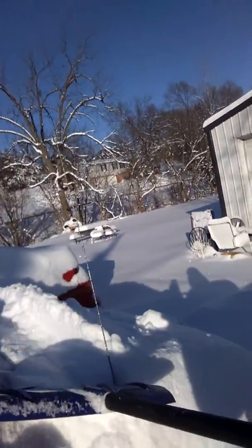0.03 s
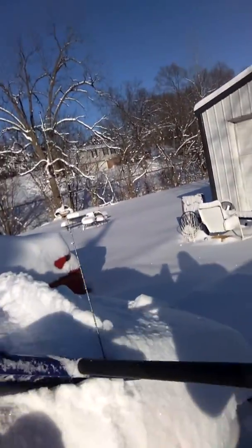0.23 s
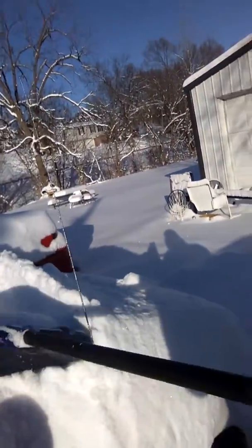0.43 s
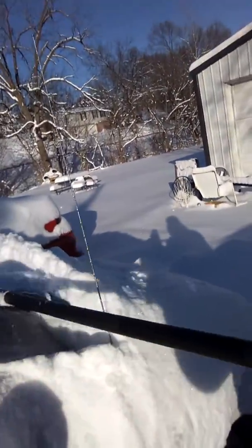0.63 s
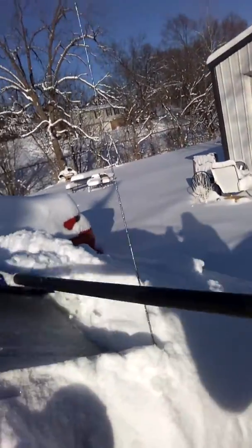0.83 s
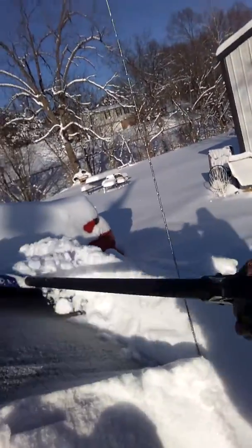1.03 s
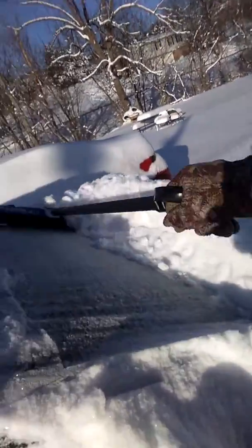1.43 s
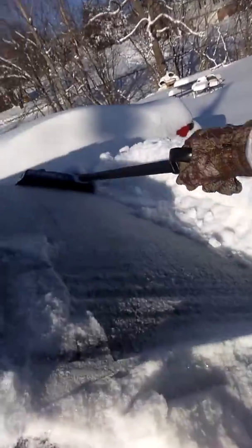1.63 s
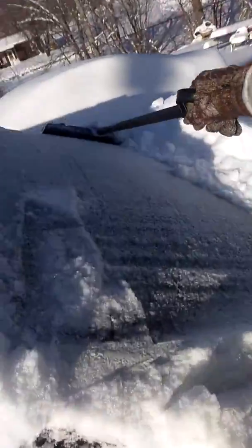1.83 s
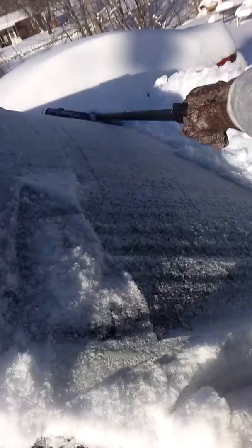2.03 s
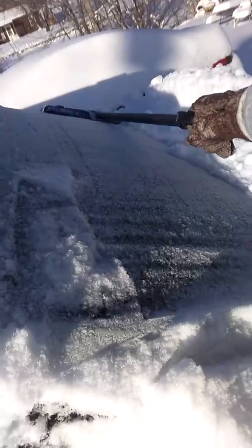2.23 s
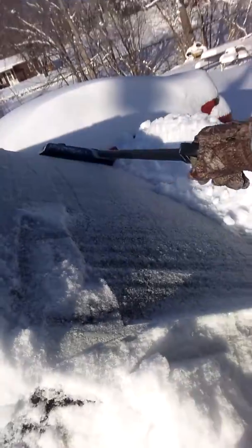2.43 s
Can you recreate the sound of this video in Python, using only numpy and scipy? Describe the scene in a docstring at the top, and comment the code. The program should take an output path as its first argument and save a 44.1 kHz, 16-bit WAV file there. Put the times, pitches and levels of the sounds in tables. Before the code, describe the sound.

A snow brush scrapes across a frosty car window, close by. The gritty, fizzing rasp swells from about 0.1 seconds and stays loud from 0.3 to 1.6, with a hollow drone from the glass and a few light bumps. From 1.7 to 2.5 seconds it eases into a faint snowy rustle with small ticks of ice. Low wind puffs thump the microphone, mostly between 1.5 and 2.2 seconds.

```python
"""A snow brush scrubs across a frosty car window, close to a handheld camera. Its bristles stick and slip:
they rasp and fizz on the frost while the pane drones underneath. The brush then eases off into soft snow,
with ticks of ice and bristle flicks, as puffs of air thump on the two microphone ports.
The ports have opposite polarity; the left one rings near 10 kHz and clips at the height of the stroke."""
import sys
import numpy as np
from scipy import signal
from scipy.fft import rfft, irfft, next_fast_len
from scipy.io import wavfile
from scipy.ndimage import uniform_filter1d, map_coordinates

SR = 44100
rng = np.random.default_rng(int(sys.argv[2]) if len(sys.argv) > 2 else 0)


def put_to_file(sound):
    """Save the sound as 16-bit audio at rate SR, in the file named by the first command-line argument."""
    columns = np.atleast_2d(sound).T  # one column per channel
    safe = np.clip(columns, -1, 1)
    whole_steps = np.round(safe * 32767)
    wavfile.write(sys.argv[1], SR, whole_steps.astype(np.int16))


N = 110250


def hard_stroke():
    """Bristles stick and slip on frost; the same slips drive the rasp, the pane's drone and the fizz."""
    # faders of the stroke: time_s, rasp_db, pane_db, fizz_db
    stroke = [(0.09, -52, -57, -47.5), (0.126, -44, -72, -36.5), (0.15, -38.5, -60, -34),
              (0.198, -23.5, -39, -22), (0.222, -23, -38, -19.5), (0.27, -12, -29.5, -7.5),
              (0.306, -21, -36, -18.5), (0.33, -15.5, -21.5, -6), (0.402, -19, -25.5, -15.5),
              (0.426, -14, -20.5, -8), (0.474, -15, -18, -8), (0.51, -13.5, -21, -8),
              (0.595, -16, -17.5, -11), (0.618, -18.5, -20, -9.5), (0.65, -14, -16, -11),
              (0.8, -18, -21, -9.5), (0.918, -16.5, -24, -10.5), (1.134, -15.5, -25.5, -14.5),
              (1.29, -17, -23.5, -21.5), (1.45, -18, -24.5, -23), (1.59, -14.5, -24.5, -25.5),
              (1.614, -22, -43.5, -24), (1.638, -23, -35.5, -22), (1.686, -31.5, -45.5, -40.5)]
    # the brush head catches and bumps the pane: start_s, level_db
    bump_hits = [(.266, -21), (.469, -21), (1.157, -23.5)]
    # bright rasp, hollow pane, fizz ringing in the left port: freq_hz, gain_db
    rasp_eq = [(200, -48), (800, -6), (1500, -3), (2200, 0), (2900, -1.5), (3600, 0), (4500, 0), (5500, -3),
               (7500, -0.5), (10000, -1), (13000, -22), (15500, -13.5)]
    pane_eq = [(100, -20), (220, -3.5), (330, -9), (420, -7), (520, -0.5), (600, 1), (690, 2.5),
               (850, -0.5), (1100, -1), (1280, -10.5), (1500, -4.5), (2200, -28.5), (4000, -46)]
    fizz_eq = [(2000, -55), (6000, -20.5), (7800, -14.5), (8800, -2), (9800, 1), (10600, -3.5), (11500, -8),
               (13000, -15.5), (15500, -24.5)]
    # stereo lean of rasp and pane: freq_hz, left_minus_right_db
    rasp_pan = [(1200, 5.5), (2000, 4.5), (3300, -1.5), (5000, 0), (7000, 0), (9500, 14.5), (13000, -17)]
    pane_pan = [(350, 1.5), (620, 2.5), (780, 5), (950, 7), (1150, 7.5), (1500, 4), (2200, -2.5)]
    rasp_gain, pane_gain, fizz_gain = levels(stroke)
    bumps = bursts(bump_hits, decay_s=0.0097)
    shared = grains(per_s=3200, decay_s=0.00087, spread_db=4, smooth=0.38)
    shared *= flutter(depth_db=1.1, per_s=120)
    slips = lambda: unit(shared * flutter(depth_db=-0.38, per_s=300))  # each layer adds its own chatter
    rasp = pan_by_band(friction(rasp_eq, rasp_gain * slips() + amp(-7.5) * bumps), rasp_pan)
    pane = pan_by_band(friction(pane_eq, pane_gain * slips() + bumps), pane_pan)
    fizz = friction(fizz_eq, fizz_gain * unit(slips() * flutter(depth_db=0.94, per_s=69.9)))
    fizz[1] *= amp(-24.5)  # barely there on the right
    return amp(-1.5) * rasp + amp(2) * pane + amp(0.3) * fizz


def friction(eq, envelope, off_axis_share=0.43, off_axis_rad=2.03):
    """Rubbing noise at two ports: their sum has a hollow that follows the brush; off axis they diverge."""
    # the brush's path past the camera: time_s, left_lead_ms
    bearing = [(.2, 0.17), (.37, 0.17), (.52, 0.12), (.7, 0.069), (1.0, 0.069), (1.28, 0.066),
               (1.37, 0.021), (1.44, 0.0011), (1.53, -0.022), (1.64, -0.042), (1.76, -0.061), (1.95, -0.17),
               (2.4, -0.2)]
    # extra phase from the path around the camera body: freq_hz, left_lead_rad
    body_phase = [(150, 0.26), (700, 0.24), (1250, -0.18), (2000, -0.69), (2600, -1.09), (3300, -0.47),
                  (4200, -0.056), (5000, 0.51), (7000, -0.43)]
    # scattered sound, different at each port, with the brush dead ahead: freq_hz, power_share
    scatter = [(200, 0.03), (650, .04), (1300, .05), (2100, 0.04), (5000, .001), (6800, 0.02), (9000, 0.6),
               (15000, 0)]
    colour = lambda hz: amp(along(eq, hz))
    noise = streaky_ripple(rng.standard_normal((3, N)))  # one direct voice, two scattered
    noise = filtered(noise * envelope / filtered(noise[0], colour).std(), colour)
    hz, t, voices = signal.stft(noise, SR, nperseg=256)
    hz = hz[:, None]
    lead_s = np.interp(t, *np.transpose(bearing)) / 1000
    phase = 2 * np.pi * hz * lead_s + along(body_phase, hz)
    off_axis = 1 - np.exp(-(phase / off_axis_rad) ** 2)
    share = np.clip(along(scatter, hz) + off_axis_share * off_axis, 0, 1)
    direct = voices[0] * np.array([np.exp(.5j * phase), -np.exp(-.5j * phase)])  # right is inverted
    ports = np.sqrt(1 - share) * direct + np.sqrt(share) * voices[1:]
    return signal.istft(ports, nperseg=256)[1][:, :N]


def streaky_ripple(x, depth=1.3):
    """Random narrow dips and peaks come and go, making the noise streaky."""
    bands = signal.stft(x, nperseg=1024)[2]
    chance = rng.standard_normal(bands.shape) + 1j * rng.standard_normal(bands.shape)
    field = uniform_filter1d(chance, size=4, axis=1)  # smooth across frequency
    field = uniform_filter1d(field, size=12, axis=2)  # and across time
    return signal.istft(bands * np.abs(1 + depth * field / field.std()), nperseg=1024)[1][:, :N]


def grains(per_s, decay_s, spread_db, smooth):
    """Gritty envelope of rms 1: countless tiny slips of random size over a smooth share."""
    onsets = rng.random(N) < per_s / SR
    sizes = amp(spread_db * np.clip(rng.standard_normal(N), -2.5, 2.5))
    power = signal.lfilter([1], [1, -np.exp(-1 / (decay_s * SR))], onsets * sizes ** 2)
    return np.sqrt(smooth + (1 - smooth) * power / power.mean())


def low_rub():
    """The pane's dull, low rubbing body under the stroke."""
    # fader of the low rub: time_s, level_db
    rub_fader = [(.27, -44), (.33, -32), (.4, -32), (.47, -19.5), (.59, -21.5), (.7, -27), (.85, -38),
                 (1.0, -39), (1.4, -29.5), (1.6, -34)]
    # its muffled tone: freq_hz, gain_db
    rub_eq = [(100, -18.5), (250, -5), (400, 0), (520, -6.5), (800, -22), (2000, -43)]
    rub = grains(per_s=410, decay_s=0.0032, spread_db=1.5, smooth=0.87)
    return friction(rub_eq, levels(rub_fader)[0] * rub)


def soft_brushing():
    """The brush rustles through loose snow and cracks a few crumbs of ice."""
    # light brushing before and after the stroke: time_s, level_db
    lead_in = [(0, -43.5), (.035, -40.5), (.06, -50), (.1, -90)]
    easing = [(1.7, -29.5), (1.808, -31), (1.832, -38.5), (1.88, -35), (1.916, -40.5), (1.94, -30),
              (1.964, -47), (2.0, -38.5), (2.048, -40.5), (2.06, -52), (2.076, -42), (2.096, -51.5),
              (2.132, -46), (2.15, -52), (2.175, -49), (2.3, -65.5), (2.312, -47.5), (2.372, -35.5),
              (2.496, -29.5)]
    # ice cracking under the bristles: start_s, level_db
    crumbs = [(.033, -53), (.132, -34), (1.737, -30), (1.803, -26), (1.876, -28), (1.899, -30.5),
              (1.938, -51), (1.999, -32), (2.077, -50), (2.126, -41), (2.157, -40), (2.432, -44),
              (2.457, -25)]
    # tone of soft snow: freq_hz, gain_db
    snow_eq = [(100, 1.5), (500, 7.5), (800, -4), (1250, 7.5), (1700, -2), (2700, 3), (3900, -3.5),
               (5500, -2.5), (7500, -7.5), (9300, -3), (10500, -14.5), (12000, -28), (15500, -39)]
    # its stereo lean: freq_hz, left_minus_right_db
    snow_pan = [(300, 2.5), (1200, 2.5), (5500, -4), (7500, 1), (9500, 13), (12000, -8)]
    crunch = grains(per_s=1200, decay_s=0.001, spread_db=5, smooth=0.45)
    rustle = amp(-5.5) * (levels(lead_in)[0] + levels(easing)[0]) * crunch
    cracks = amp(-2) * bursts(crumbs, decay_s=0.0036)
    return pan_by_band(friction(snow_eq, np.hypot(rustle, cracks)), snow_pan)


def bristle_flicks(rise_share=0.33):
    """Short, crisp swishes of bristles springing free, and one brief, bright crack of ice."""
    # bristles let go, and at 0.132 s a brief, bright crack of ice: start_s, level_db, decay_s
    flicks = [(.002, -35, 0.038), (.132, -17, 0.0016), (1.992, -31.5, 0.023)]
    # their thin, bright tone: freq_hz, gain_db
    flick_eq = [(2000, -38), (5500, -6), (7000, 0.5), (9200, 2.5), (10300, -10), (11500, -19),
                (15500, -44.5)]
    t = clock()
    envelope = np.zeros(N)
    for start_s, level_db, decay_s in flicks:
        attack = 1 - np.exp(-np.abs(t - start_s) / (rise_share * decay_s))
        envelope += attack * bursts([(start_s, level_db)], decay_s)
    grit = grains(per_s=3300, decay_s=0.00022, spread_db=6, smooth=0.2)
    return friction(flick_eq, envelope * grit) * panned(left_db=5.5)


def wind():
    """Light, gusty air hits each microphone port separately."""
    # faders of the rumble: time_s, left_db, right_db
    breeze = [(0, -22.5, -28), (.15, -53, -41), (.19, -32, -32.5), (.27, -50, -40), (.33, -24, -23.5),
              (.45, -30, -24.5), (.6, -17.5, -28), (.7, -47, -50), (1.15, -36, -31), (1.4, -28, -36),
              (1.58, -23, -24), (1.7, -26.5, -15), (1.8, -37, -14), (1.95, -47, -23.5), (2.03, -28, -28),
              (2.12, -49, -56), (2.28, -72.5, -32), (2.37, -38.5, -54), (2.5, -32, -55)]
    # puffs on each port: centre_s, level_db, width_s
    left_puffs = [(0.009, -39, 0.0015), (0.038, -16.5, 0.00078), (1.478, -14, 0.0022), (1.508, -6, 0.00098),
                  (1.521, -3, 0.0038), (1.541, -9.5, 0.0027), (1.869, -26.5, 0.0021), (2.012, -12, 0.0035),
                  (2.358, -24.5, 0.0036), (2.468, -22, 0.0013)]
    right_puffs = [(.022, -19.5, 0.018), (0.126, -10, 0.0036), (.8, -21.5, 0.0048), (0.982, -14.5, 0.0083),
                   (1.654, -9.5, 0.0018), (1.7, 0, 0.004), (1.71, -3, 0.0023), (1.757, -1, 0.0047),
                   (1.786, -12, 0.011), (1.802, -30, 0.0039), (1.841, 3, 0.0048), (1.892, -9, 0.0026),
                   (1.91, -3, 0.0037), (1.927, -10, 0.0027), (1.943, -6.5, 0.0034), (2.045, -9, 0.0043),
                   (2.096, -18.5, 0.013), (2.159, -9.5, 0.0034), (2.2, -24.5, 0.0041),
                   (2.242, -16.5, 0.0023)]
    left_db, right_db = curves(breeze)
    return np.array([air_on_port(left_db, left_puffs), air_on_port(right_db, right_puffs)])


def air_on_port(rumble_db, puffs, port_hz=57, puff_trim_db=4.5):
    """Uneven rumble, and pressure puffs that the port's bass cut turns to thumps; the strongest splutter."""
    # tones of the rumble, the eddies around a puff and its splutter: freq_hz, gain_db
    rumble_eq = [(15, -46), (35, -16), (60, 0), (100, -1.5), (160, -7), (300, -12.5), (500, -31.5),
                 (1200, -55), (4000, -90)]
    wake_eq = [(15, -36), (35, -7), (65, 8), (105, -7), (170, -14), (300, -27), (600, -44), (2000, -77.5)]
    splutter_eq = [(100, 5), (330, 5.5), (550, -11.5), (1000, -19), (2000, -43.5), (5000, -64.5)]
    t = clock()
    pressure = lambda stretch: sum(amp(db + puff_trim_db) * np.exp(-((t - s) / (stretch * width)) ** 2)
                                   for s, db, width in puffs)
    thumps = filtered(-pressure(stretch=1), lambda hz: hz ** 4 / (hz ** 4 + port_hz ** 4))
    gusts = unit(flutter(depth_db=4.6, per_s=34.91))
    rumble = amp(rumble_db - 5) * gusts * turbulence(rumble_eq)
    wake = pressure(stretch=3.03)
    eddies = 0.13 * wake * turbulence(wake_eq)
    splutter = amp(-30.5) * wake ** 2 * turbulence(splutter_eq)
    return rumble + thumps + eddies + splutter


def turbulence(eq):
    """Eddy noise of rms 1 on one port."""
    return unit(filtered(rng.standard_normal(N), lambda hz: amp(along(eq, hz))))


def amp(db):
    """Decibels to gain."""
    return 10 ** (np.asarray(db) / 20)


def unit(x):
    """Scale to rms 1."""
    return x / np.sqrt(np.mean(x ** 2) + 1e-20)


def along(points, hz):
    """Read (freq_hz, value) points on a log frequency axis."""
    freqs, values = np.transpose(points)
    return np.interp(np.log(hz + 1), np.log(freqs + 1), values)


def clock():
    """Time of each sample in seconds."""
    return np.arange(N) / SR


def curves(rows):
    """One automation curve for each column after the time."""
    times, *columns = np.transpose(rows)
    return [np.interp(clock(), times, column) for column in columns]


def levels(rows, fade_db_per_s=499):
    """Gain curves that fade out beyond their first and last rows."""
    t = clock()
    outside_s = np.maximum(rows[0][0] - t, 0) + np.maximum(t - rows[-1][0], 0)
    return [amp(db - fade_db_per_s * outside_s) for db in curves(rows)]


def bursts(rows, decay_s):
    """Envelope of sudden, quickly dying hits."""
    t = clock()
    return sum(amp(db) * (t >= s) * np.exp(-np.abs(t - s) / decay_s) for s, db in rows)


def flutter(depth_db, per_s):
    """A gain that glides through per_s random values a second."""
    return amp(depth_db * map_coordinates(rng.standard_normal(4096), [clock() * per_s], mode="wrap"))


def filtered(x, response):
    """Shape x with a frequency response."""
    size = next_fast_len(N + SR // 2)
    return irfft(rfft(x, size) * response(np.fft.rfftfreq(size, 1 / SR)), size)[..., :N]


def panned(left_db):
    """Left and right gains of constant total power."""
    gains = amp(np.array([[.5], [-.5]]) * left_db)
    return gains / np.sqrt(np.mean(gains ** 2, axis=0))


def pan_by_band(pair, lean):
    """Give each frequency its own left-right balance."""
    return filtered(pair, lambda hz: panned(along(lean, hz)))


def scene(bass_cut_hz=31):
    """Brush, pane and air at the two ports, which pass no deep bass."""
    air = wind()
    body = low_rub()
    mix = hard_stroke() + body + soft_brushing() + bristle_flicks() + air
    return filtered(mix, lambda hz: hz ** 6 / (hz ** 6 + bass_cut_hz ** 6))


def record(dry, ceiling=1.01, top_hz=15700):
    """The camera clips the highest peaks and keeps nothing above its band limit."""
    clipped = dry / (1 + np.abs(dry / ceiling) ** 8) ** (1 / 8)
    return filtered(clipped, lambda hz: 1 / (1 + (hz / top_hz) ** 200))


dry = scene()
out = record(dry)
put_to_file(out)
```